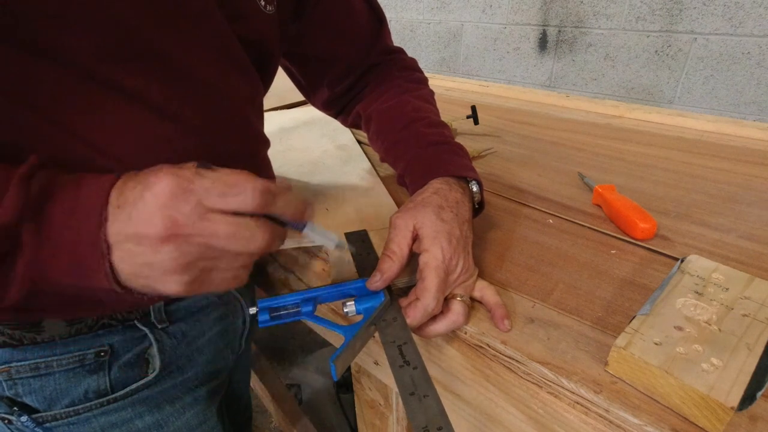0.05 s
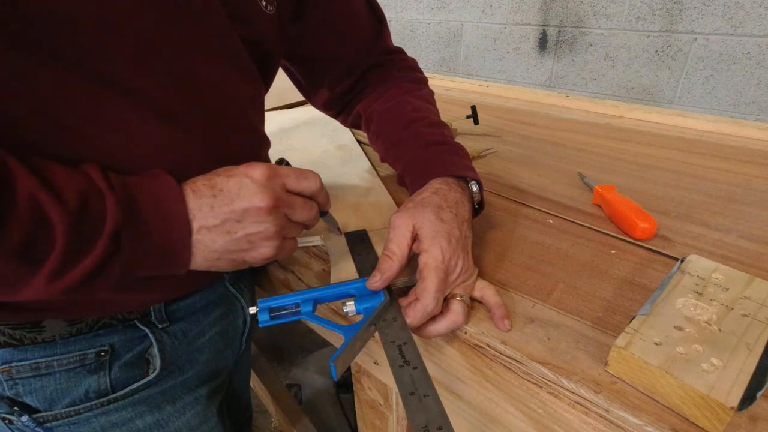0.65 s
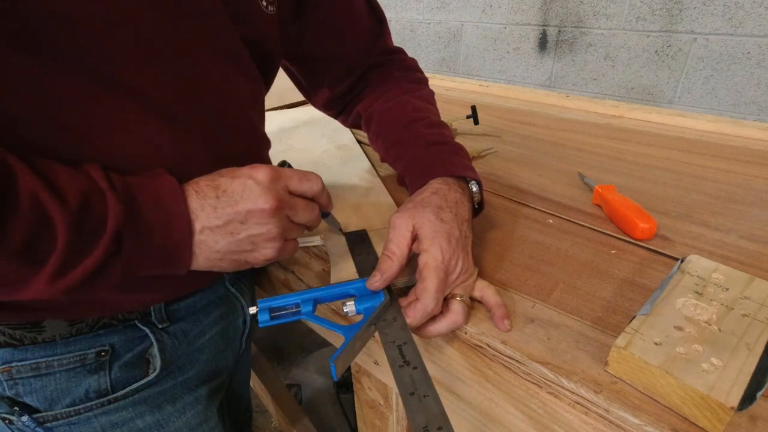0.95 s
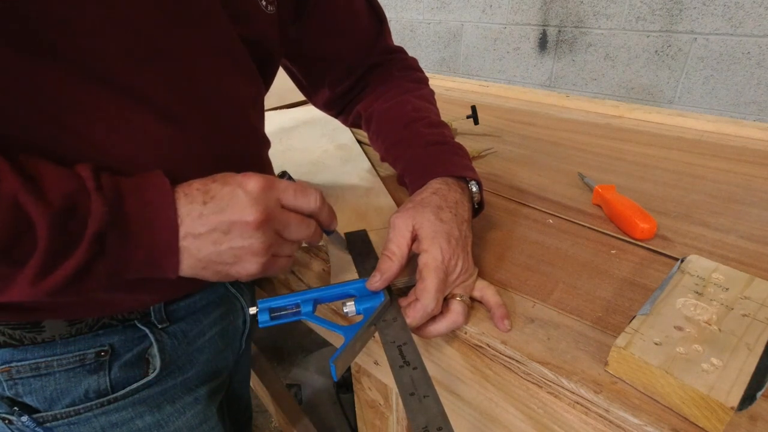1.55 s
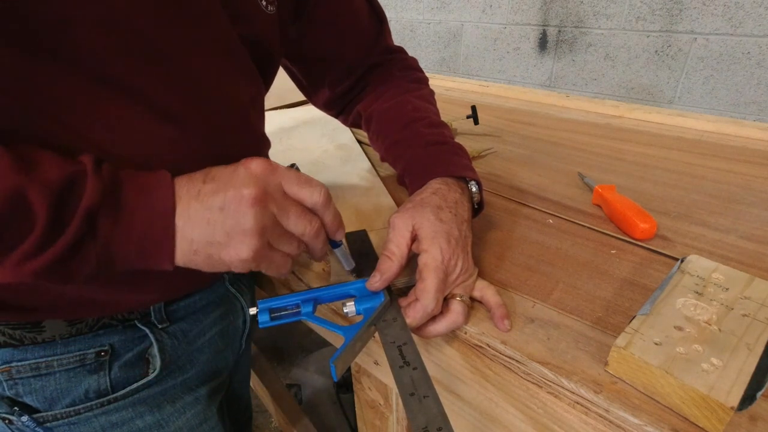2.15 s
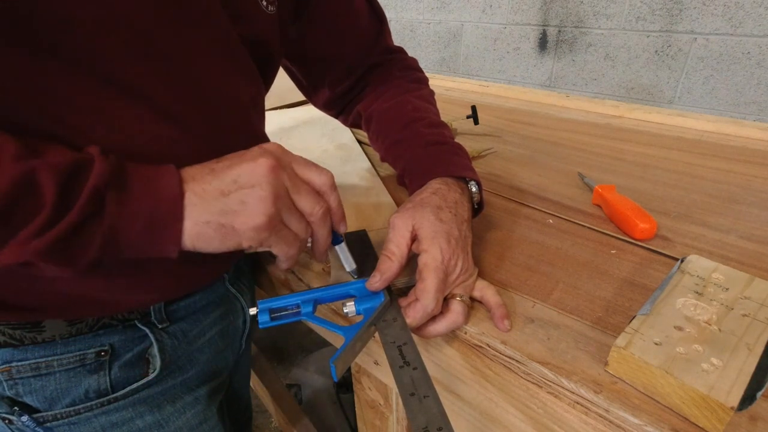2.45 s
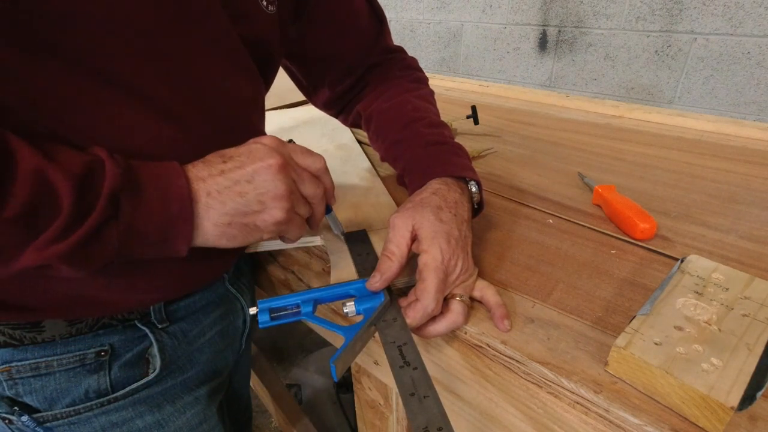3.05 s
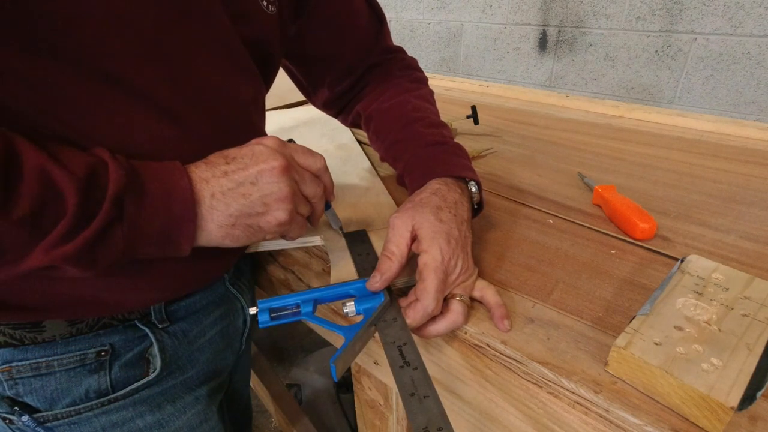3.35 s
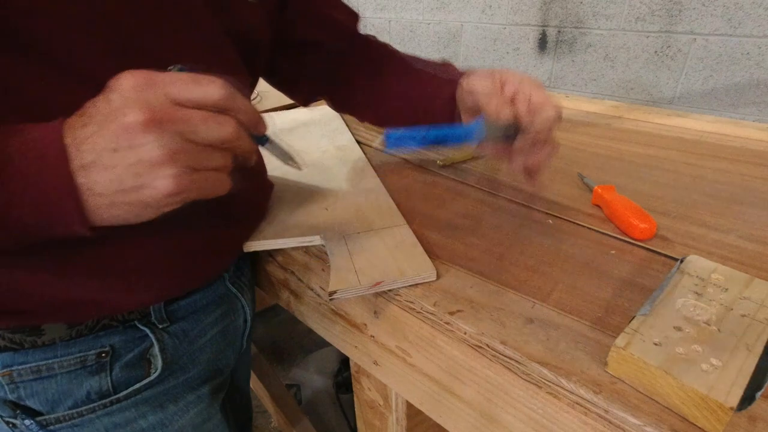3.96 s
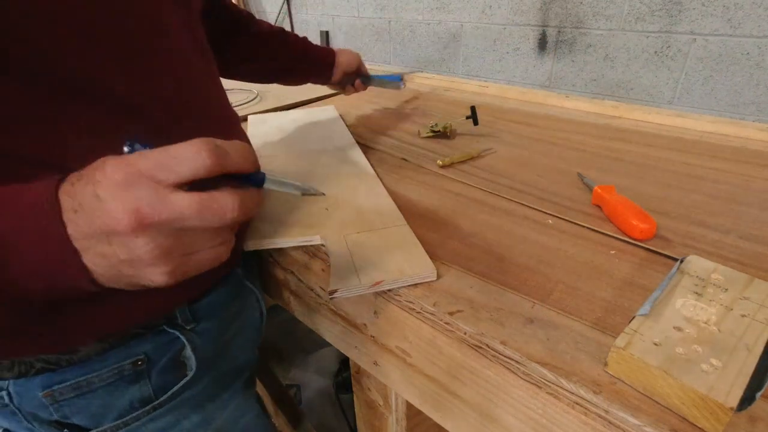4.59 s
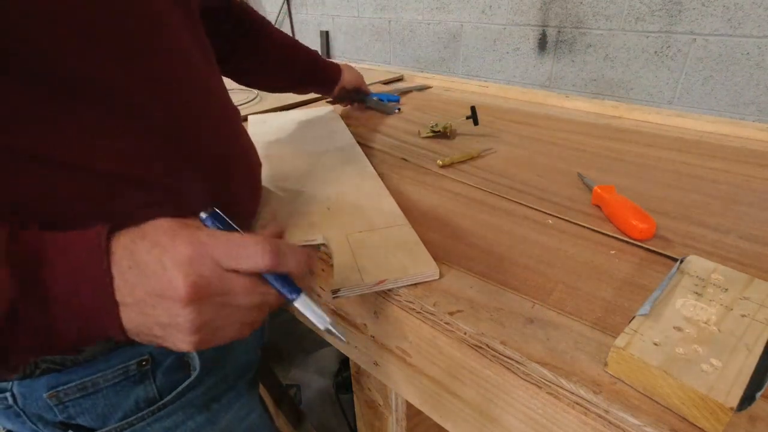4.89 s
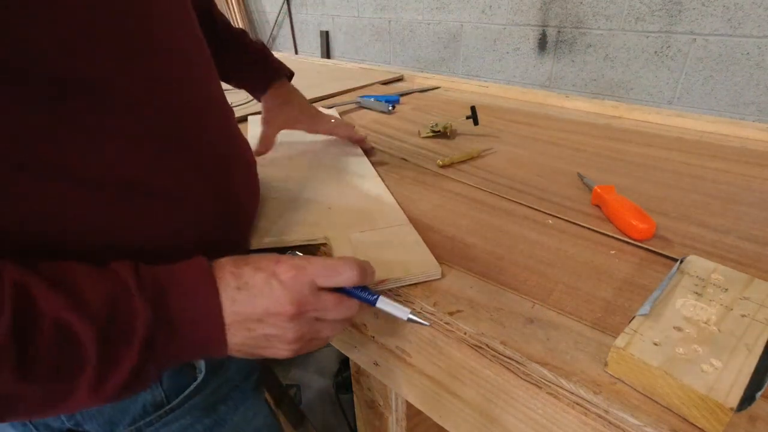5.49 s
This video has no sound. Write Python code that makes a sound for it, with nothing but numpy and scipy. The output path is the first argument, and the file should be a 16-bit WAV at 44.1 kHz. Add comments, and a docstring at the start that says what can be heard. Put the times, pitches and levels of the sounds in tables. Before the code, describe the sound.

A metal square rattles off plywood, then clacks down on a wooden bench, over a faint machine hum in a small workshop.

```python
"""Steel square on a workbench

A machine hums in a small workshop, over moving air and a swelling low drone. A pen scratches and ticks
against a combination square's blade. The square rattles up off a plywood sheet, a sleeve rustles, and
the square touches down at the back of the bench, then drops flat with a clack. Knocks and tiny slips
ring the modes of steel and wood; loud knocks pull an automatic gain down, and it stays low."""
import sys
import numpy as np
from scipy import signal
from scipy.fft import rfft, irfft
from scipy.io import wavfile
from scipy.ndimage import uniform_filter1d

SR = 44100
rng = np.random.default_rng(int(sys.argv[2]) if len(sys.argv) > 2 else 0)


def master_out(mix):
    """Clip the mix to full scale and print it as 16-bit PCM to the path in sys.argv[1]."""
    frames = np.transpose(np.atleast_2d(mix))
    ceiling = np.clip(frames, -1, 1)
    pcm = np.round(ceiling * 32767).astype(np.int16)
    wavfile.write(sys.argv[1], SR, pcm)


N = 243852
TIME = np.arange(N) / SR
BIN_HZ = np.arange(N // 2 + 1) * SR / N


def from_db(db):
    """Decibels to gain."""
    return 10 ** (np.asarray(db) / 20)


def rms_one(x):
    """Scale to rms 1."""
    return x / np.sqrt(np.mean(x ** 2) + 1e-20)


def at_hz(points, hz):
    """Read a curve on a log-frequency axis."""
    f, value = np.transpose(points)
    return np.interp(np.log(np.maximum(hz, 1)), np.log(f), value)


def drift(rate_hz):
    """Slow random modulation of rms 1."""
    return rms_one(irfft(rfft(rng.standard_normal(N)) / (1 + (BIN_HZ / rate_hz) ** 4), N))


def swell(start_s, attack_s, hold_s, release_s):
    """Rise to 1, hold, then die away."""
    age = TIME - start_s
    return np.clip(age / attack_s, 0, 1) * np.exp(-np.maximum(age - attack_s - hold_s, 0) / release_s)


def soften(x, hz):
    """Second-order low-pass."""
    return signal.sosfilt(signal.butter(2, min(hz, SR * .45), fs=SR, output="sos"), x)


def resonate(x, hz, width):
    """One resonance with gain 1 at its peak."""
    r = np.exp(-np.pi * width / SR)
    feedback = [1, -2 * r * np.cos(2 * np.pi * hz / SR), r * r]
    return signal.lfilter(np.array([1, 0, -1]) * (1 - r * r) / 2, feedback, x + 1e-18)


def whistle(hz, width):
    """Noise sent twice through a resonance: an unsteady tone of rms 1."""
    return rms_one(resonate(resonate(rng.standard_normal(N), hz, width), hz, width))


def strike(contacts, modes, split_hz, uneven_db, grit, grit_t60, size=1024):
    """Each contact is a push plus gritty chatter; thump drives the low modes, snap the high ones."""
    pushes = []
    for s, thump_db, snap_db, hardness_hz in contacts:
        chatter = np.diff(rng.standard_normal(size + 1)) * from_db(-60 * np.arange(size) / SR / grit_t60)
        push = signal.unit_impulse(size) + grit * chatter / np.linalg.norm(chatter)
        pushes.append((round(s * SR), thump_db, snap_db, soften(push, hardness_hz)))
    out = np.zeros(N)
    for k, (hz, width, level_db) in enumerate(modes):
        snap_share = 1 / (1 + (split_hz / hz) ** 4)
        force = np.zeros(N)
        for at, thump_db, snap_db, push in pushes:
            drive_db = (1.5 - snap_share) * thump_db + snap_share * snap_db
            force[at:at + size] += push * from_db(drive_db + uneven_db * rng.standard_normal())
        out += (-1) ** k * from_db(level_db) * resonate(force, hz, width)
    return out


def rub(envelope, modes, level_db, slips_per_s, patchy_db):
    """Tiny slips of one surface over another excite resonances, each catching in patches of its own."""
    slips = (rng.random(N) < slips_per_s / SR) * rng.standard_normal(N)
    rings = sum((-1) ** k * from_db(db) * resonate(slips * from_db(patchy_db * drift(25)), hz, width)
                for k, (hz, width, db) in enumerate(modes))
    return envelope * from_db(level_db) * rms_one(rings)


# stereo width of diffuse sound: (frequency [Hz], side minus mid [dB])
STEREO_WIDTH = [(30, -26), (100, -37), (200, -26.5), (380, -12.5), (700, -14.5), (1290, -7.5), (2380, 0.5),
                (4400, -0.5), (15000, -5)]
def spread(mid, hz, wider_db=0):
    """Left and right spectra: equally loud, in step in the bass, apart in phase in the treble."""
    side = 1j * mid * rng.standard_normal(len(hz)) * from_db(at_hz(STEREO_WIDTH, hz) + wider_db)
    return mid + side * np.array([[1], [-1]])


# the hum's strong lines: (order [multiple of the turning rate], level [dB])
STRONG_ORDERS = [(8, -54), (11, -51), (14, -57), (15, -59), (16, -61), (18, -58), (20, -60), (21, -61),
                 (22, -61), (24, -62), (28, -62), (29, -61), (34, -62), (35, -61), (38, -58), (39, -58),
                 (43, -61), (52, -60), (53, -59), (56, -63), (58, -62), (59, -51.5), (60, -64), (61, -48),
                 (62, -55), (63, -64), (68, -65)]
# contour of the weaker lines: (frequency [Hz], level [dB])
WEAK_ORDER_CONTOUR = [(50, -61), (150, -64.5), (370, -68), (760, -65), (1090, -70.5), (1460, -79.5),
                      (2130, -87.5), (3050, -83), (3860, -96), (5000, -110)]
def machine(turn_hz=17.411, speed_wander=.00036, whine_hz=2945, size=16384, count=280):
    """The same rattle comes round on every turn, giving a comb of lines and a thin whine."""
    orders = np.arange(count)
    hz = orders * turn_hz
    level_db = at_hz(WEAK_ORDER_CONTOUR, hz) + 3.5 * rng.standard_normal(count)
    for order, db in STRONG_ORDERS:
        level_db[round(order)] = db
    # it runs without a knock: of 100 random phasings, take the smoothest over the turn
    phasings = from_db(level_db) * (orders > 0) * np.exp(2j * np.pi * rng.random((100, count)))
    envelopes = np.abs(np.fft.ifft(phasings * (hz > 500), size))
    lines = phasings[np.argmin(envelopes.std(axis=1))]
    one_turn = irfft(spread(lines, hz), size) * size / np.sqrt(2)
    turns = np.cumsum(turn_hz * (1 + speed_wander * drift(1.34))) / SR
    rattle = np.array([np.interp(turns % 1 * size, np.arange(size), c) for c in one_turn])
    whine = np.sqrt(2) * from_db(-72 + 3 * drift(1)) * np.sin(2 * np.pi * whine_hz / turn_hz * turns)
    return (rattle + whine) * from_db(.7 * drift(2.45))


# resonances of the housing: (frequency [Hz], width [Hz], level [dB])
HOUSING_MODES = [(1058, 84, -60), (1665, 110, -68), (3560, 130, -70), (5890, 70, -84)]
def housing_flutter():
    """Turbulence whistles faintly in the machine's housing."""
    rings = sum(from_db(db) * whistle(hz, width) for hz, width, db in HOUSING_MODES)
    return irfft(spread(rfft(rings), BIN_HZ), N)


# room tone: (frequency [Hz], noise density [dB])
AIR_SPECTRUM = [(12, -64), (28, -63), (48, -67.5), (105, -63), (200, -71), (300, -76.5), (800, -81.5),
                (1080, -79.5), (1400, -86.5), (2400, -91), (3450, -88.5), (4200, -101), (5900, -107),
                (6900, -118), (8300, -115), (10000, -121.5), (13500, -119), (15500, -119.5)]
def air():
    """Smooth rush of moving air over the room's rumble."""
    noise = spread(rfft(rng.standard_normal(N)), BIN_HZ)
    return irfft(noise * from_db(at_hz(AIR_SPECTRUM, BIN_HZ)), N) * np.sqrt(SR / 2)


# swells of the drone: (start [s], hold [s], pitch [Hz], level [dB])
DRONE_TONES = [(0.343, 0.23, 86, -48.5), (2.486, 0.18, 87.14, -43.5), (2.946, 1, 110.3, -47),
               (4.593, 0.97, 102.6, -36)]
def drone(waver_hz=1.35, waver_db=2, creep_hz_per_s=1.8, attack_s=.22, release_s=.97):
    """Low tones swell one after another; each wavers and creeps upward."""
    out = np.zeros(N)
    for start_s, hold_s, start_hz, level_db in DRONE_TONES:
        hz = start_hz + creep_hz_per_s * (TIME - start_s) + waver_hz * drift(5.4)
        gain = swell(start_s, attack_s, hold_s, release_s) * from_db(level_db + waver_db * drift(6.5))
        out += np.sqrt(2) * gain * np.sin(2 * np.pi * np.cumsum(hz) / SR)
    return out


# the pen's tick: (time [s], thump [dB], snap [dB], hardness [Hz])
PEN_HIT = [(2.3708, -8.5, 1.3, 8450)]
# the blade's bright ring: (frequency [Hz], width [Hz], level [dB])
BLADE_MODES = [(3400, 900, -13), (5000, 1200, -21), (6400, 65, 4.5), (7745, 90, 1.5), (7900, 200, -12),
               (8600, 200, -8)]
def pen():
    """A pen scratches along the steel blade and ticks against it."""
    tick = strike(PEN_HIT, BLADE_MODES, split_hz=2000, uneven_db=6, grit=.61, grit_t60=.015)
    stroke = swell(2.35, .014, .008, .004)
    return tick + rub(stroke, BLADE_MODES, level_db=-62.5, slips_per_s=920, patchy_db=3)


# clatter of the lift: (time [s], thump [dB], snap [dB], hardness [Hz])
LIFT_HITS = [(3.8598, -13, 3.5, 16000), (3.8640, -21, -7.5, 12000), (3.8705, -14, 1.5, 16000),
             (3.8830, 0.5, -11, 2200), (3.8912, 2, -11, 1800), (3.8960, -7, -7, 4500),
             (3.9035, -4, -4, 4500), (3.9095, -6, -5, 5000), (3.9195, -1, -5.5, 3800),
             (3.9285, -2.5, -13, 900), (3.9390, -10, -5, 2800), (3.9700, -9, -18, 1200)]
# sliding steel, then the square on plywood: (frequency [Hz], width [Hz], level [dB])
STEEL_SLIDE_MODES = [(4650, 150, -6), (6350, 120, 0), (7060, 50, 2), (7910, 60, -6), (9050, 40, 9),
                     (11000, 250, -10), (12100, 250, -10), (13100, 80, -7)]
LIFT_MODES = [(174, 24, 20.5), (288, 114, 13), (452, 18, 23), (584, 86, 7), (940, 56, 7), (1120, 110, 1),
              (1415, 38, 14), (2060, 280, 9.5), (2205, 200, 5.5), (3000, 400, -14), (3800, 330, -5),
              (4640, 540, -4.5), (6250, 380, -5), (7600, 1100, -10.5), (9600, 500, -21), (12100, 1200, -36),
              (13150, 500, -19), (14600, 300, -22)]
def lift():
    """The square slides off the plywood and rattles as it rises."""
    clatter = strike(LIFT_HITS, LIFT_MODES, split_hz=760, uneven_db=4, grit=1.36, grit_t60=.027)
    stroke = swell(3.803, .014, .022, .012)
    return clatter + rub(stroke, STEEL_SLIDE_MODES, level_db=-56, slips_per_s=1400, patchy_db=-1.5)


# clear blade tones: (start [s], attack [s], hold [s], release [s], level [dB], pitch [Hz])
BLADE_TONES = [(3.860, .001, .026, .002, -47, 4725), (3.872, .002, .018, .012, -42, 1425)]
def blade_ring():
    """The freed blade sings until the fingers stop it."""
    return sum(swell(*shape) * from_db(db) * np.sqrt(2) * np.sin(2 * np.pi * hz * TIME)
               for *shape, db, hz in BLADE_TONES)


# the bump on the sheet: (time [s], thump [dB], snap [dB], hardness [Hz])
SHEET_HIT = [(3.8612, 0, 0.0053, 1800)]
# the sheet's woody body: (frequency [Hz], width [Hz], level [dB])
SHEET_MODES = [(430, 110, 20), (1220, 150, 12.5)]
def sheet_knock():
    """The square's stock bumps the plywood as it tips."""
    return strike(SHEET_HIT, SHEET_MODES, split_hz=840, uneven_db=0, grit=.1, grit_t60=.01)


# rasp of the cloth: (frequency [Hz], width [Hz], level [dB])
CLOTH_BANDS = [(3200, 780, -2.4), (4150, 470, 0.42)]
def sleeve():
    """A sleeve rustles as the arm reaches back."""
    stroke = swell(4.575, .018, .005, .028)
    return rub(stroke, CLOTH_BANDS, level_db=-55.5, slips_per_s=5300, patchy_db=6)


# first contacts with the bench: (time [s], thump [dB], snap [dB], hardness [Hz])
TOUCH_HITS = [(4.8540, 4.5, -4, 2000), (4.8580, -12, -2, 9000), (4.8665, 3.5, 7.5, 16000),
              (4.8785, -3, 5, 2300), (4.9470, -2, -16, 900), (5.0860, -1.5, -20, 600)]
# the square standing on its edge: (frequency [Hz], width [Hz], level [dB])
EDGE_MODES = [(166.5, 25, 14), (275, 33, 14.5), (355, 60, 10.5), (570, 280, 4.5), (917, 42, 13),
              (1090, 94, 2), (1470, 230, 2.5), (2160, 260, -2), (2620, 310, -2), (4560, 450, -9),
              (6150, 350, -8.5), (8600, 1000, -18), (9800, 300, -13), (11000, 500, -17), (12600, 800, -16),
              (15100, 300, -21)]
def touch_down(rattle_start_s=4.88, first_gap_s=.0062, loss_db_per_s=150, softening=.49):
    """The square lands on edge; its loose blade rattles, each contact weaker and softer."""
    rattle = []
    for k in range(5):
        age = first_gap_s * (2 ** k - 1)   # each gap doubles
        loss_db = loss_db_per_s * age
        rattle.append((rattle_start_s + age, 4 - loss_db, -10.5 - loss_db, 12000 * softening ** k))
    return strike(TOUCH_HITS + rattle, EDGE_MODES, split_hz=1750, uneven_db=.5, grit=.86, grit_t60=.016)


# hiss of steel on the bench: (frequency [Hz], width [Hz], level [dB])
BRUSH_BANDS = [(5800, 1500, -5), (8650, 1400, 2), (12200, 900, -4)]
def brush():
    """The square brushes lightly over the bench."""
    return rub(swell(4.91, .04, .13, .1), BRUSH_BANDS, level_db=-68, slips_per_s=1800, patchy_db=1)


# thin squeaks: (start [s], hold [s], pitch [Hz], level [dB])
STEEL_SQUEAKS = [(4.935, .035, 12300, -75), (4.955, .045, 14560, -72), (4.995, 0.041, 5420, -69),
                 (5.005, .035, 8320, -70), (5.115, .003, 8820, -66)]
def squeaks(attack_s=.015, release_s=.012):
    """Where the dragged steel catches, one of its resonances sings for a moment."""
    return sum(swell(start_s, attack_s, hold_s, release_s) * from_db(db) * whistle(hz, width=170)
               for start_s, hold_s, hz, db in STEEL_SQUEAKS)


# dull body of the scuff: (frequency [Hz], width [Hz], level [dB])
WOOD_SCUFF_MODES = [(280, 70, 2), (600, 180, -3), (900, 100, -6), (2600, 600, -15)]
def scuff():
    """The stock scuffs over the wood before it drops."""
    stroke = swell(5.083, .006, .06, .015)
    return soften(rub(stroke, WOOD_SCUFF_MODES, level_db=-43, slips_per_s=2500, patchy_db=1), hz=2600)


# the drop and its bounces: (time [s], thump [dB], snap [dB], hardness [Hz])
DROP_HITS = [(5.1843, -5, 15.5, 2100), (5.1878, 0.5, 1.5, 2000), (5.1915, 2.5, -6, 2000),
             (5.2150, 3.5, -24, 1200), (5.2370, 0, -24, 900), (5.2615, 3, -30, 350)]
# the square lying flat: (frequency [Hz], width [Hz], level [dB])
FLAT_MODES = [(185, 40, 6), (275, 63, 7.5), (357, 59, 11), (603, 43, 17), (890, 45, 10), (1290, 70, 22),
              (1520, 70, 15.5), (1940, 340, 16), (2120, 120, -6), (2300, 160, 9.5), (2950, 120, -10),
              (3380, 600, 0.5), (4100, 260, -12), (5240, 130, -13), (6400, 1400, -23), (8700, 740, -12)]
def clack():
    """The square drops flat on the bench and settles."""
    return strike(DROP_HITS, FLAT_MODES, split_hz=1200, uneven_db=1, grit=.5, grit_t60=.011)


# the blade's landing: (time [s], thump [dB], snap [dB], hardness [Hz])
SLAP_HIT = [(5.2048, 0, 0.005, 10000)]
# the blade against the bench: (frequency [Hz], width [Hz], level [dB])
SLAP_MODES = [(880, 68, 14), (1035, 55, -3), (1610, 63, 8.5), (2680, 670, 3.5), (4040, 380, 0.5),
              (5160, 380, -10), (8690, 960, -14.5)]
def blade_slap():
    """The blade slaps down just after the stock."""
    return strike(SLAP_HIT, SLAP_MODES, split_hz=1200, uneven_db=-2.5, grit=.7, grit_t60=.0087)


# the workshop's reverb: (frequency [Hz], decay time to -60 dB [s])
ROOM_DECAY = [(150, 1), (600, 0.99), (2000, 0.66), (5000, 0.62), (9000, 0.48), (15000, 0.33)]
def workshop(x, near_db, room_db, near_t60, near_width, right_lead_s=.00003):
    """Direct sound, quick scatter off bench and body, and a diffuse tail that dies sooner in the treble."""
    t = TIME[:SR * 3 // 4]
    hz = np.fft.rfftfreq(len(t), 1 / SR)
    mid, side = rng.standard_normal((2, len(t))) * from_db(-60 * t / near_t60) * (t > .0007)
    # small surfaces return little bass
    mid = signal.sosfilt(signal.butter(2, 600, "high", fs=SR, output="sos"), mid)
    near = rms_one(mid + near_width * side * np.array([[1], [-1]]))
    diffuse = spread(rfft(rng.standard_normal(len(t))), hz, wider_db=-3)
    edges = np.geomspace(60, 18000, 11)
    tail = 0
    for low, high in zip(edges, edges[1:]):
        band = irfft(diffuse * (hz >= low) * (hz < high), len(t))
        tail = tail + band * from_db(-60 * t / at_hz(ROOM_DECAY, np.sqrt(low * high)))
    tail = rms_one(tail * np.clip(t / .0028 - .5, 0, 1))   # the walls answer after a few ms
    response = from_db(near_db) * near + from_db(room_db) * tail
    direct = x + right_lead_s * SR / 2 * np.gradient(x) * np.array([[-1], [1]])
    return direct + signal.fftconvolve(x[None], response, axes=1)[:, :N] / np.sqrt(len(t))


def scene():
    """Handling close by, then at the back of the bench, over a bed of hum and air."""
    bed = machine() + housing_flutter() + air() + drone()
    close = workshop(pen(), near_db=0, room_db=-21, near_t60=.04, near_width=1.2)
    close += workshop(lift() + sleeve(), near_db=2, room_db=-13.5, near_t60=.065, near_width=1.4)
    close += blade_ring()
    close += workshop(sheet_knock(), near_db=4, room_db=-19, near_t60=.035, near_width=1)
    landing = touch_down() + brush() + squeaks() + scuff()
    far = workshop(landing, near_db=-3.5, room_db=-8.5, near_t60=.025, near_width=.19)
    far += workshop(clack(), near_db=-11, room_db=-11, near_t60=.03, near_width=.9)
    far += workshop(blade_slap(), near_db=-1, room_db=-3, near_t60=.039, near_width=1.2)
    return bed + close + far


def gain_control(x, threshold_db=-41, depth_db=8, attack_s=.07, recovery_db_per_s=1.1):
    """A sharp knock turns the gain down; it creeps back only slowly."""
    treble = signal.sosfilt(signal.butter(2, 1500, "high", fs=SR, output="sos"), x.mean(axis=0))
    level_db = 10 * np.log10(np.abs(uniform_filter1d(treble ** 2, size=256)) + 1e-12)
    cut_db = np.clip(2 * (level_db - threshold_db), 0, depth_db)
    held_db = np.maximum.accumulate(cut_db + recovery_db_per_s * TIME) - recovery_db_per_s * TIME
    r = np.exp(-1 / (attack_s * SR))
    return x * from_db(-signal.lfilter([1 - r], [1, -r], held_db))


def record(dry):
    """A 4 ms fade-in, gain control, then a steep cut above 15.9 kHz."""
    faded = dry * np.sin(np.pi / 2 * np.minimum(TIME / .004, 1))
    return signal.sosfilt(signal.ellip(10, .2, 80, 15900, fs=SR, output="sos"), gain_control(faded))


dry = scene()
out = record(dry)
master_out(out)
```